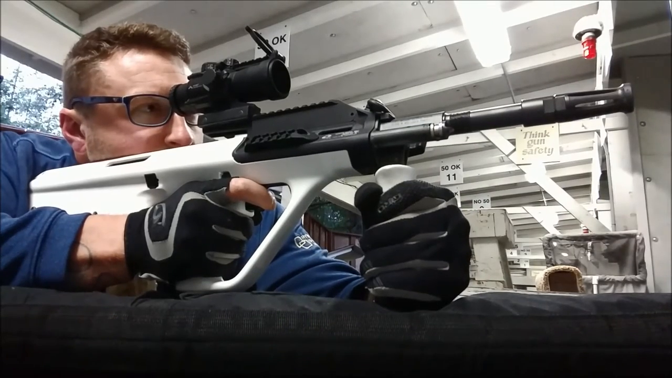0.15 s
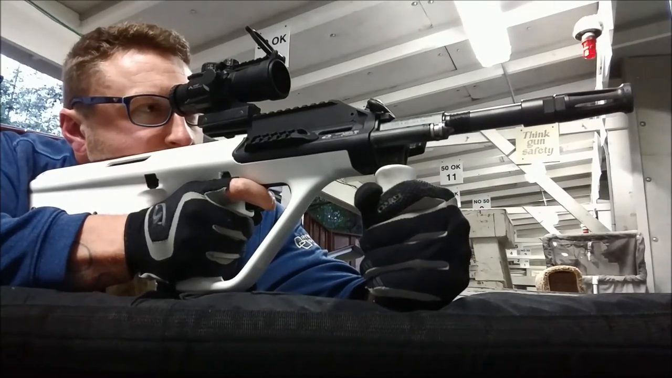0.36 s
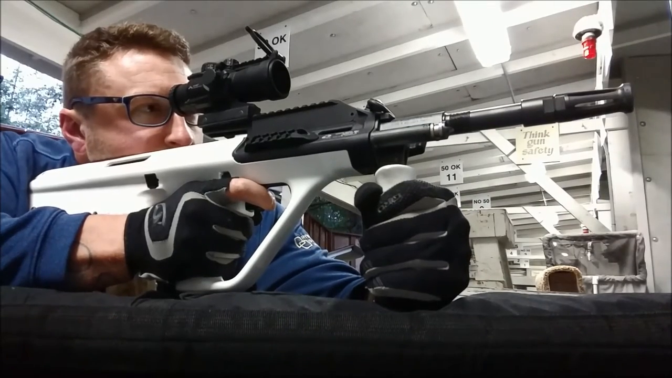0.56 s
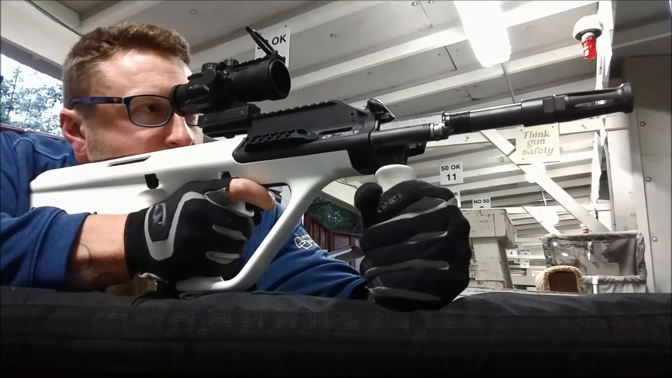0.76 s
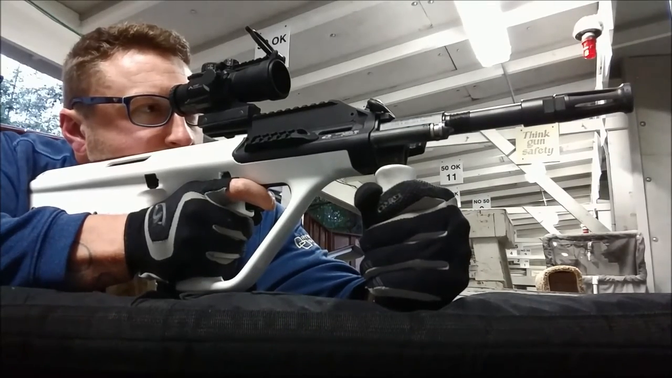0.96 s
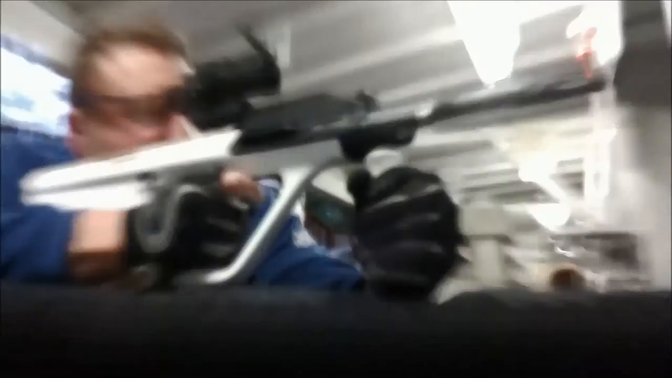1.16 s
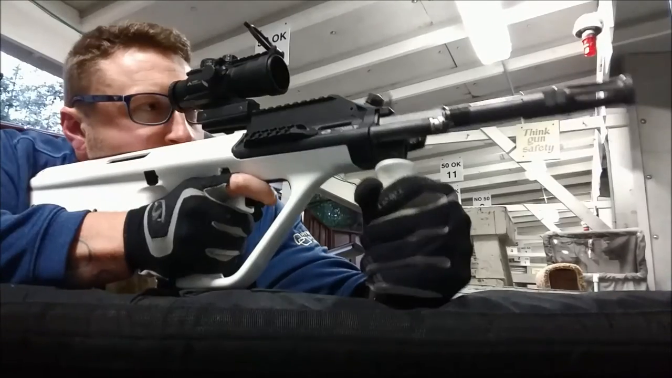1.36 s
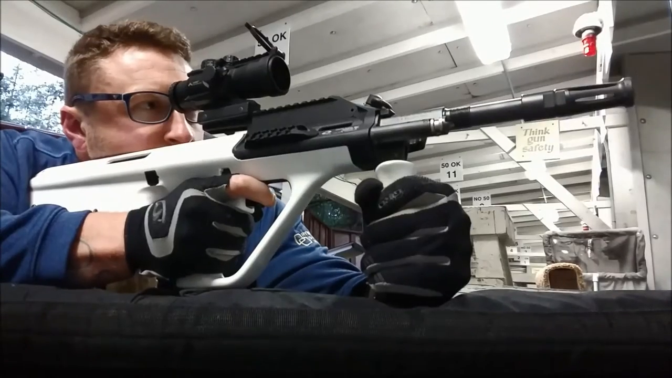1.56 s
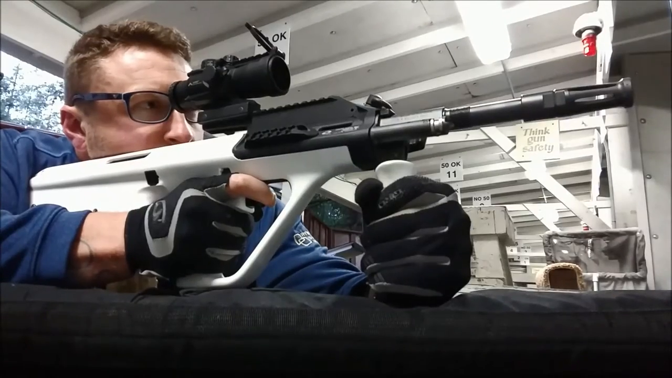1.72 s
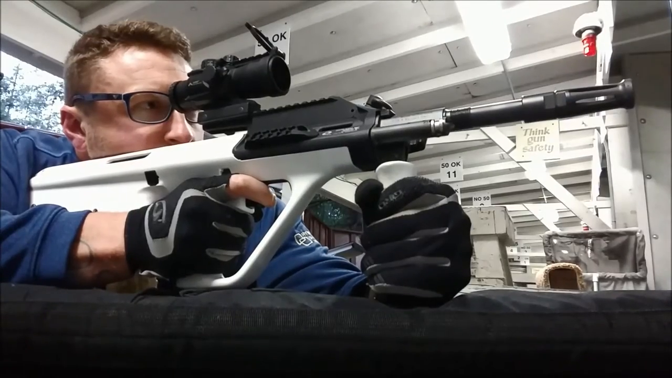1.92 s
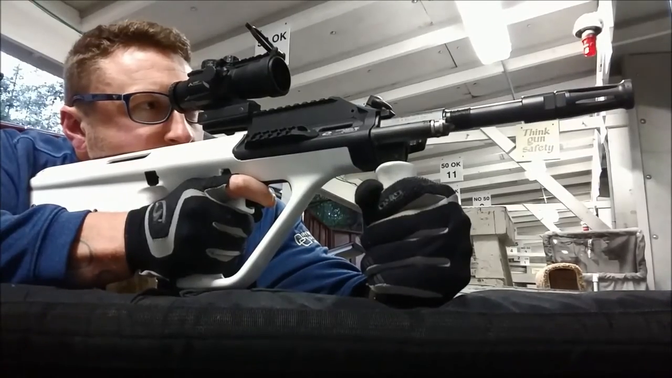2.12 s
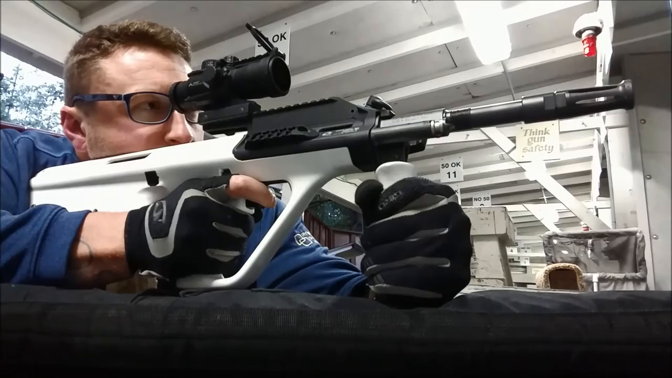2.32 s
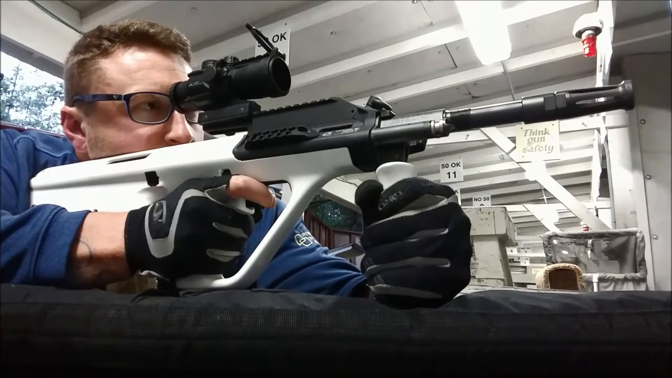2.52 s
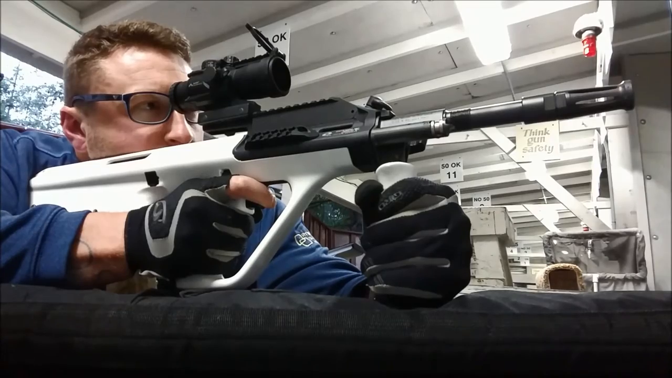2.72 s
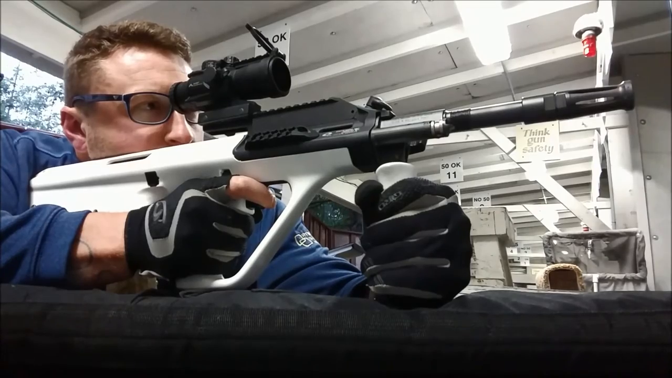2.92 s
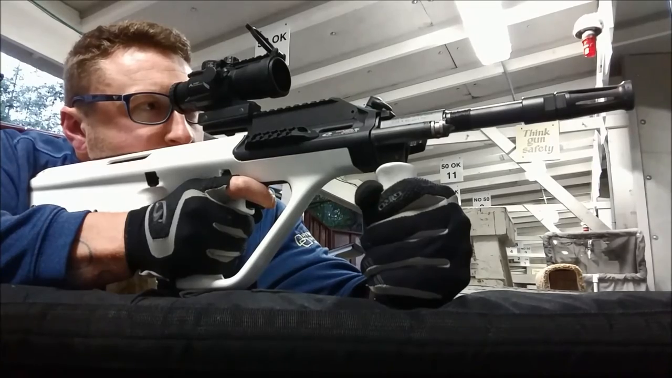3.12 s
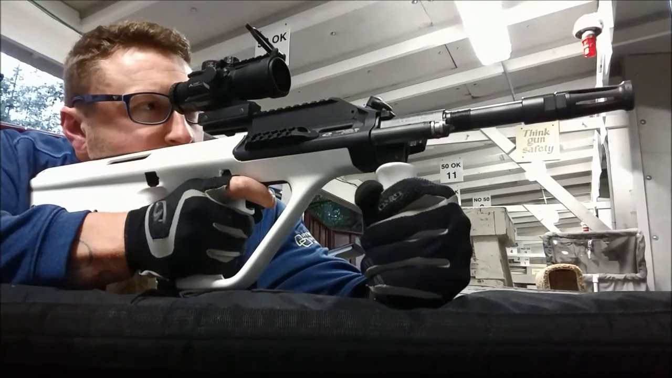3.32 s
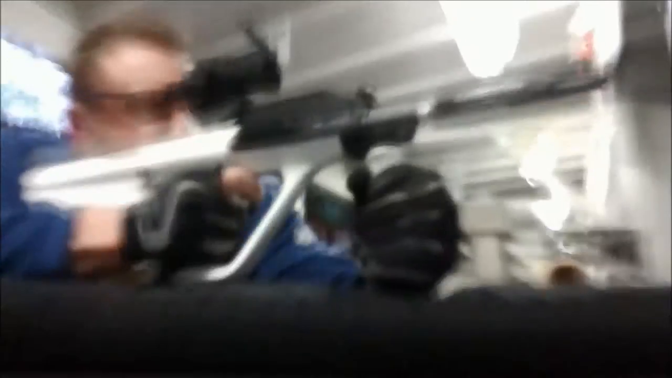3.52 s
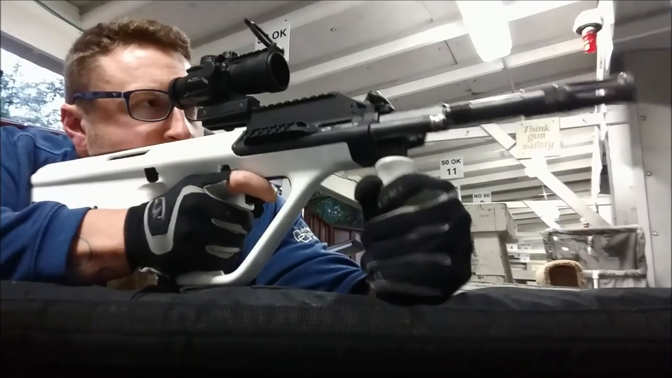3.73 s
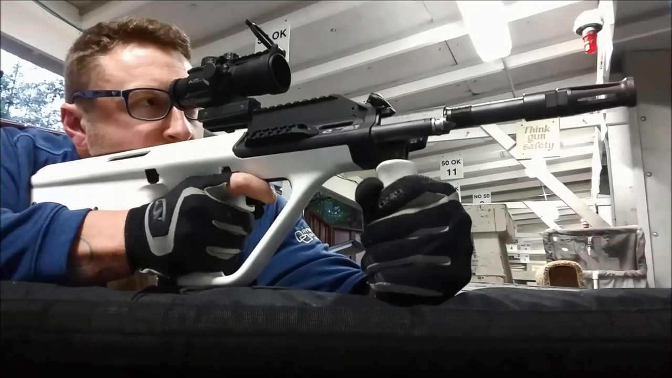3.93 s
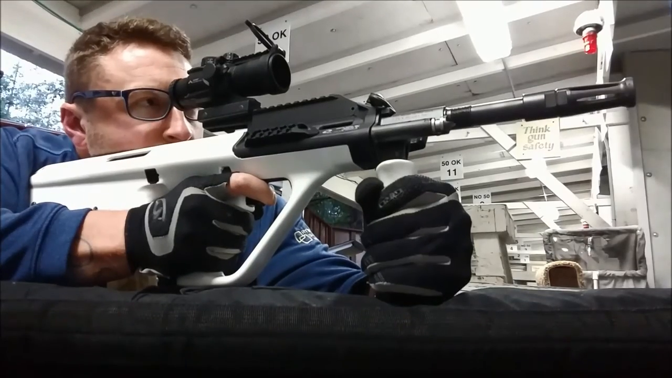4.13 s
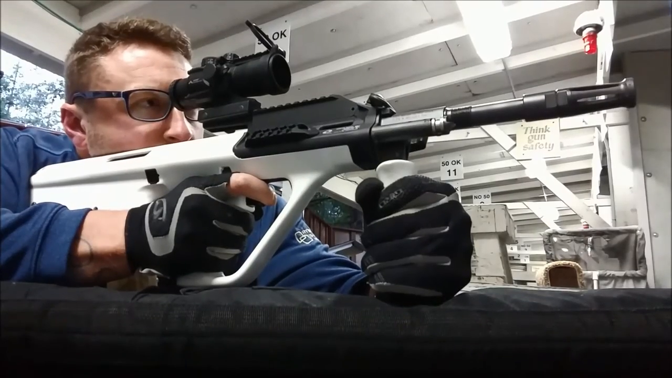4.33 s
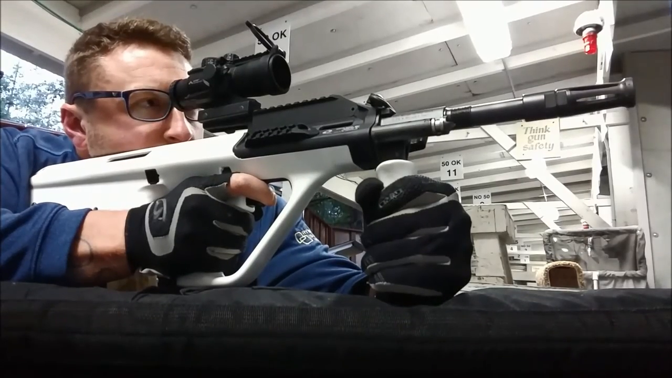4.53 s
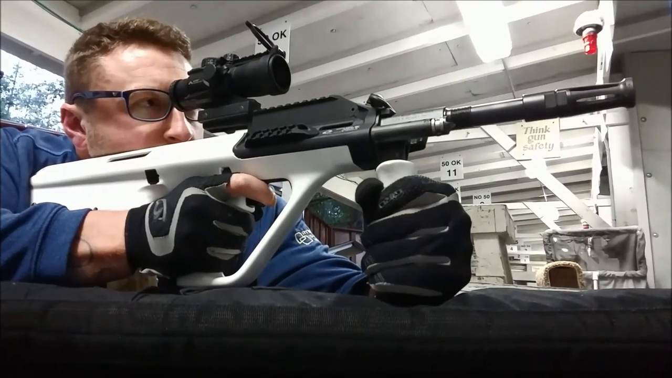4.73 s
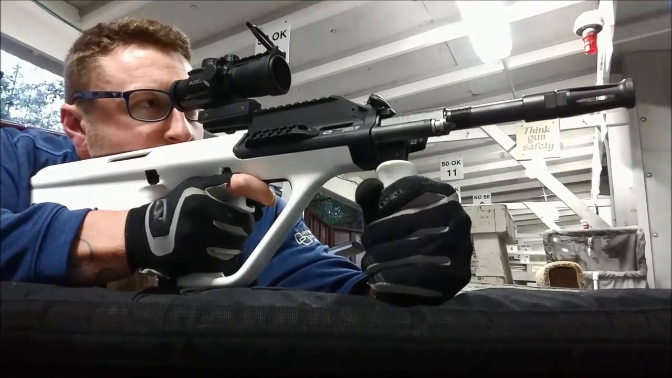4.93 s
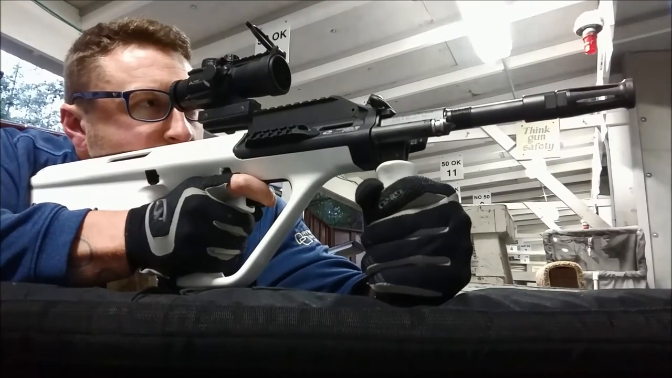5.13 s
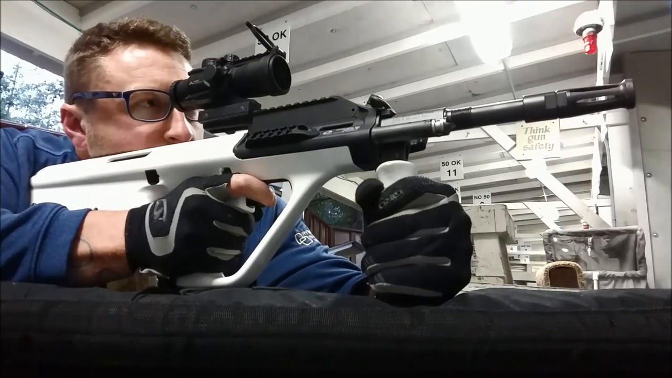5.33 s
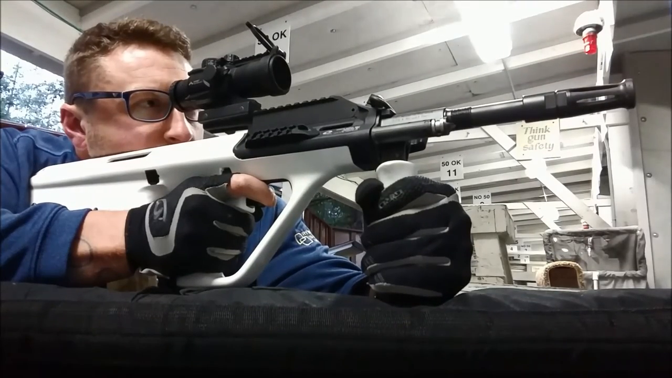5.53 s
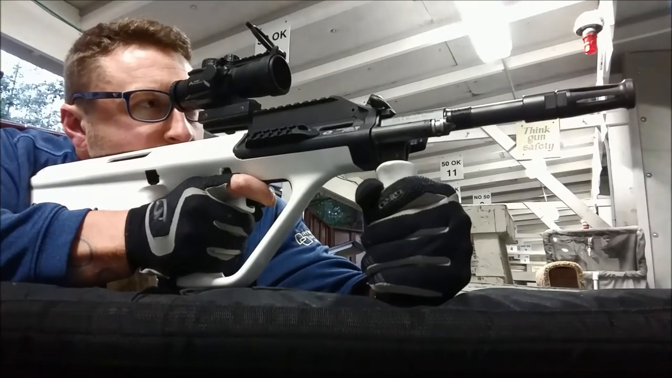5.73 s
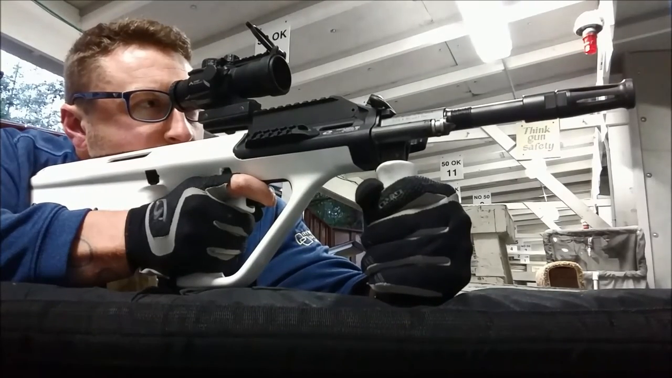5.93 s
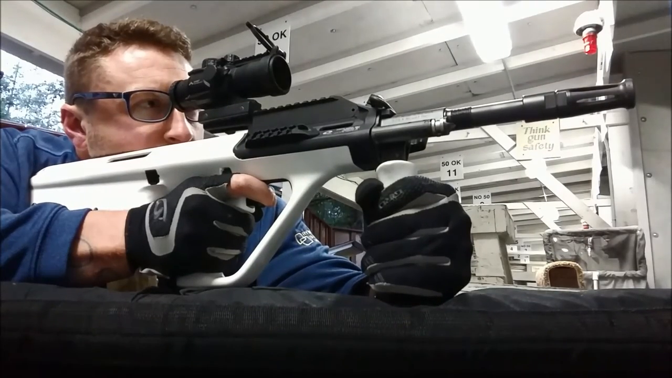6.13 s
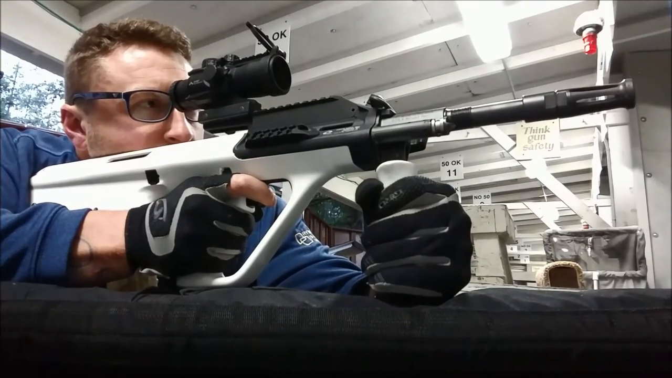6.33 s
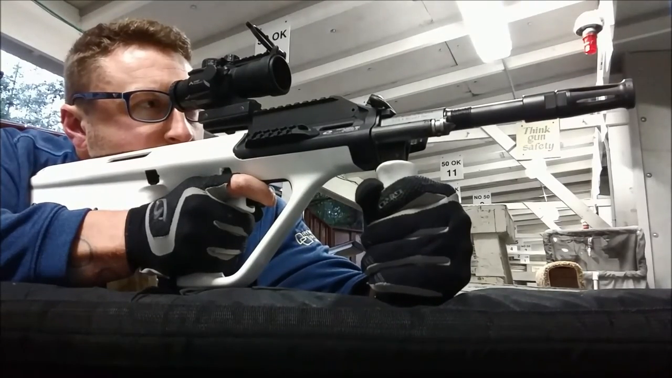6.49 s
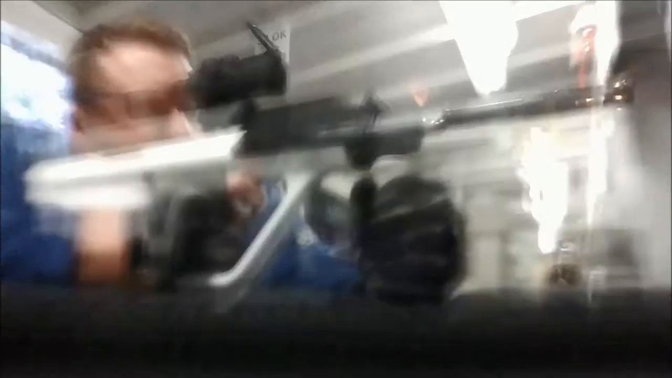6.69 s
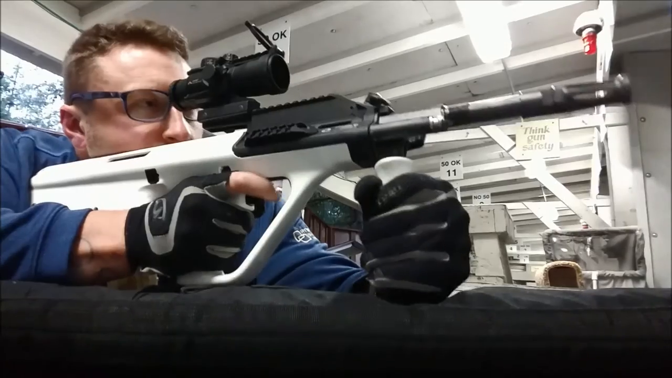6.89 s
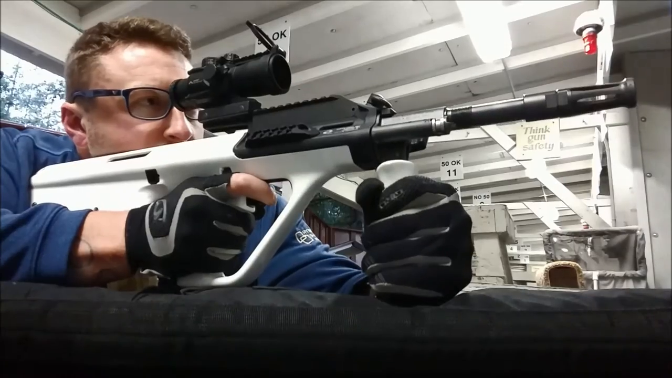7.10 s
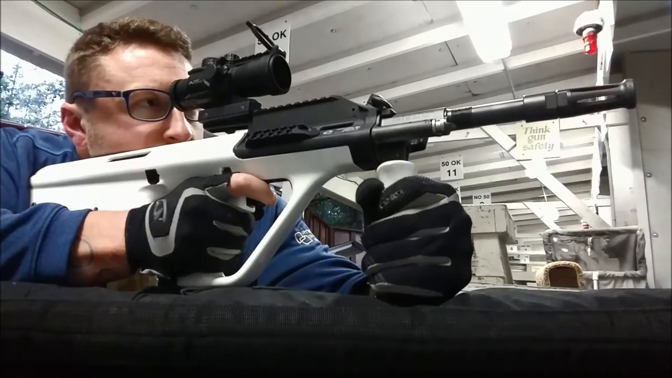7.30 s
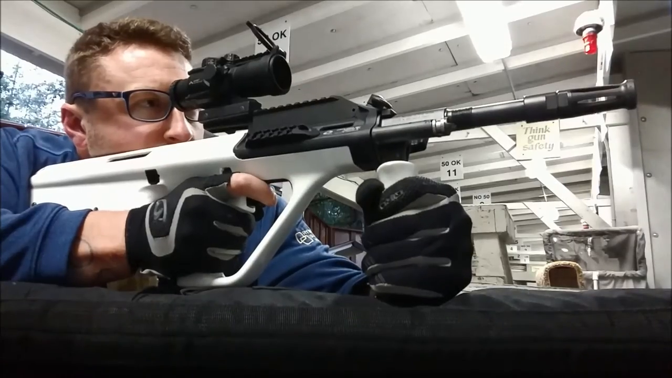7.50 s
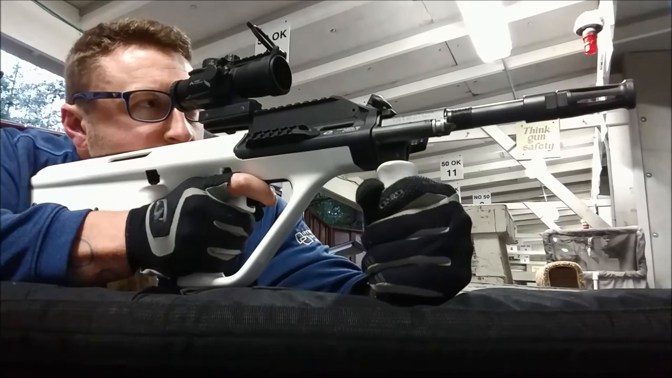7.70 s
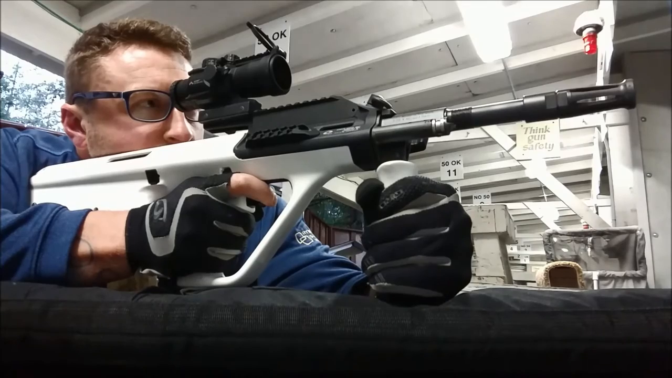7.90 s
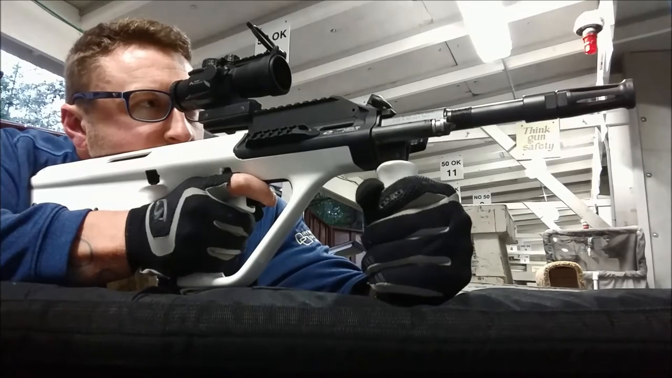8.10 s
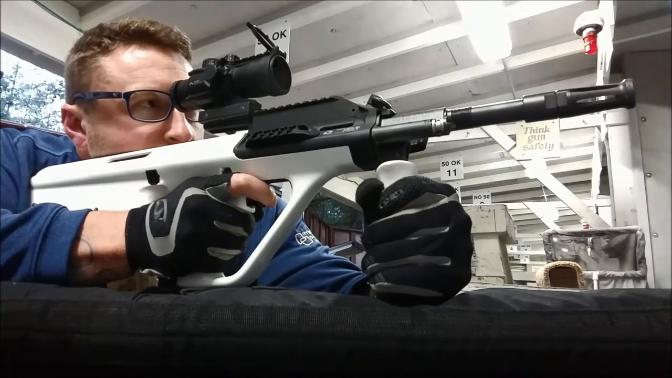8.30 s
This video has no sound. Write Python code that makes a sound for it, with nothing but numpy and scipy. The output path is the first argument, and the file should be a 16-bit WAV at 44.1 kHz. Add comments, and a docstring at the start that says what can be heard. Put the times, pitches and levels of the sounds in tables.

```python
"""A rifle fires slow single shots under the roof of a shooting range, half a metre from a phone.
Each blast overloads the two microphones, roars back from roof and baffles, slaps off the backstop
and rolls away outdoors. A neighbour fires once, further along the line. Spent brass rings and
bounces on the concrete, and one case strikes a steel panel. Underneath lies a bed of open air,
with faint rustles as the shooter settles."""
import sys
import numpy as np
from scipy import signal
from scipy.fft import rfft, irfft, next_fast_len
from scipy.io import wavfile

SR = 44100
rng = np.random.default_rng(int(sys.argv[2]) if len(sys.argv) > 2 else 0)


def generate_wav(signal):
    """Clip the signal to [-1, 1] and save it as 16-bit WAV at the path in sys.argv[1]."""
    frames = np.transpose(np.atleast_2d(signal))
    scaled = np.clip(frames, -1, 1) * 32767
    pcm = np.round(scaled).astype(np.int16)
    wavfile.write(sys.argv[1], SR, pcm)


N = 368235

# bed of open air: (frequency [Hz], noise density [dB])
OPEN_AIR = [(25, -85), (42, -79.5), (60, -81), (82, -76.5), (130, -82), (200, -87), (330, -92), (750, -94),
            (1050, -102), (2200, -103), (4200, -113), (8000, -115), (13000, -111.5), (16000, -115)]
# the shooter settles on the bench: (time [s], gain [dB])
RUSTLE_CUES = [(.655, -104), (2.965, -96), (3.305, -99), (6.28, -101), (6.51, -101)]

# noise colours and their tails: (frequency [Hz], relative density [dB], t60 [s])
SLEEVE_RUSTLE = [(200, 6, .3), (900, 3, .25), (2500, -1, .25), (7000, -7, .2), (15000, -11, .2)]
CONCRETE_TICK = [(2500, -19, .15), (5000, -8, .28), (8000, -4.5, .27), (12000, -4, .2), (16000, 1, .12)]
PANEL_KNOCK = [(130, -75, .2), (225, -42, .22), (320, -66, .2), (1000, -63, .3), (2800, -59.5, .35),
               (3600, -73, .3), (6500, -69, .28), (11000, -70, .2), (15500, -74, .15)]
NEIGHBOUR_BLAST = [(30, -53, .4), (65, -42, .35), (110, -47, .35), (170, -38, .3), (250, -40.5, .3),
                   (340, -53, .3), (650, -35, .33), (1000, -47.5, .3), (2200, -56, .3), (6000, -64, .3),
                   (14000, -67, .3)]
NEIGHBOUR_ROAR = [(30, -58, .9), (60, -55, .75), (120, -48, .5), (240, -51, .35), (350, -56, .4),
                  (650, -48, .4), (1000, -52, .45), (2000, -54, .5), (4000, -61, .5), (8000, -66, .45),
                  (13000, -70, .36), (16000, -79, .3)]
HAMMER_CLICK = [(200, -78, .06), (900, -69, .06), (2200, -70, .06), (4000, -80, .04), (6000, -96, .03),
                (14000, -102, .03)]
MUZZLE_CRACK = [(200, -50, .014), (700, -31, .014), (2000, -39, .013), (6000, -51, .013),
                (12000, -45, .011), (16000, -49, .011)]
BOOTH_REVERB = [(30, -48, .4), (65, -52, .4), (115, -40, .5), (170, -56, .4), (250, -43, .4),
                (330, -52, .4), (470, -38, .42), (700, -43, .4), (1000, -51, .3), (2000, -55, .24),
                (4000, -62, .2), (8000, -67, .2), (14000, -65, .2)]
BAFFLE_ROAR = [(25, -56, .9), (48, -49, .9), (80, -52, .6), (118, -37, .45), (175, -49, .6), (260, -47, .6),
               (370, -51.5, .55), (530, -45.5, .55), (720, -48.5, .5), (1000, -56.3, .6), (2000, -56.5, .6),
               (4000, -65.5, .75), (8000, -71.5, .7), (13000, -71.5, .5), (16000, -80, .4)]
BASS_BOOM = [(25, -46, .9), (48, -45.5, .95), (78, -59, .45), (120, -56, .5), (180, -51, .5),
             (240, -49, .5), (350, -49.5, .4), (480, -59, .3), (1000, -90, .3)]
BACKSTOP_SLAP = [(600, -62, .04), (1100, -52, .04), (1400, -33, .05), (1700, -38, .07), (2050, -64, .04),
                 (3600, -64, .04), (4300, -50, .09), (5200, -74, .04), (14000, -76, .03)]
OUTDOOR_ROLL = [(30, -53, 1.6), (48, -52.5, 1.7), (85, -65, 2.2), (150, -53.5, 3.0), (300, -64, 3.2),
                (650, -59.5, 3.3), (1050, -66.2, 2.8), (1500, -63, 2.7), (2600, -65.7, 2.05),
                (3400, -70, 1.8), (4200, -68.7, 1.5), (5200, -75.5, 1.3), (7000, -78, 1.1),
                (12000, -92, .75)]
MIC_CRACKLE = [(200, -47, .012), (1500, -45.5, .012), (3500, -55, .012), (7500, -63, .012),
               (13000, -51, .01), (16000, -57, .01)]

# ring of a brass case's mouth and of the steel panel: (frequency [Hz], relative level [dB], t60 [s])
BRASS_LOW_MODES = [(10650, -2, .25), (10730, 0, .25), (10900, -7, .24)]
BRASS_HIGH_MODES = [(14950, -10, .3), (15050, 0, .26), (15140, -6, .28), (15380, -13, .18)]
PANEL_MODES = [(994, -12, 1.0), (1341, -10, 1.6), (1439, -10, 1.5), (1781, -9, .6), (2312, -4, .77),
               (2390, -7, .5), (2544, 0, .35), (2598, -1, .5), (3058, -8, .5), (3156, -9, .54),
               (4624, -11, .45), (4673, -13, .9), (4947, -14, .46), (5620, -9, .5), (6272, -11, .46),
               (6783, -10, .48)]
# a case lands or bounces: (time [s], strength [dB], low ring against high ring [dB])
LANDINGS = [(1.788, -34, -12), (2.126, -49, -24), (2.2815, -45, -24), (4.184, -37, -5), (4.4773, -40, -30),
            (4.684, -33.5, -30), (4.8969, -52, -20), (7.4037, -34, 6), (8.3216, -49, -10)]
# out of height, a case skitters end over end: (start [s], length [s], opening strength [dB])
SKITTERS = [(-.02, .25, -47.5), (4.9627, .42, -54.5), (8.0766, .12, -56)]

# the near rifle, its first shot already rolling away as the scene opens: (time [s], gain [dB])
SHOTS = [(-1.02, 0), (1.1650, 0), (3.5453, 0), (6.7626, .8)]
# the pressure front arrives direct, then off bench, post and roof: (delay [s], gain [dB])
FRONT_PATHS = [(.0007, 10), (.0029, -2), (.0046, -7), (.0103, -6)]

# dropout after each near shot, left microphone then right: (start [s], end [s], depth [dB])
DROPOUTS = [(.059, .113, -19), (.040, .0764, -24)]
# the right microphone port hears more presence: (frequency [Hz], left minus right [dB])
PORT_COLOUR = [(100, -1.5), (700, -1.3), (1290, 0), (2380, -4.2), (4400, -3.3), (8100, .3), (15000, -1)]

NEIGHBOUR_S, PANEL_S = 7.5442, 7.9429
SKITTER_GAP_S, SKITTER_FALL_DB_PER_S, SKITTER_SCATTER_DB = .085, 30, 1.5
HAMMER_LEAD_S, JOLT_LEAD_S = .027, .0028
BOOM_DELAY_S, BACKSTOP_DELAY_S, BANK_DELAY_S, BANK_HZ = .1, .2362, .53, 152
PORT_LAG_S, CRACKLE_DELAY_S, CLIP_CEILING, TOP_HZ = 19 / SR, .0766, .84, 15900


def undb(db):
    """Decibels to gain."""
    return 10 ** (np.asarray(db) / 20)


def pan(left_db, right_db):
    """A gain for each channel."""
    return undb([[left_db], [right_db]])


def clock(seconds):
    """Time axis of a sound."""
    return np.arange(next_fast_len(int(seconds * SR))) / SR


def fade(t, t60):
    """Full level until t = 0, then a fall of 60 dB every t60."""
    return np.exp(-np.log(1000) * np.maximum(t, 0) / t60)


def swell(t, seconds):
    """Smooth attack from 0 to 1."""
    return np.sin(np.pi / 2 * np.clip(t / seconds, 0, 1)) ** 2


def along(hz, points, values):
    """Straight lines on a log-frequency axis."""
    return np.interp(np.log(np.maximum(hz, 1)), np.log(points), values)


def low_cut(sound, hz, order):
    """Roll off the bass below hz."""
    return signal.sosfilt(signal.butter(order, hz, "high", fs=SR, output="sos"), sound)


def add(out, s, sound):
    """Mix a stereo sound in at time s."""
    start = int(round(s * SR))
    lo, hi = max(start, 0), min(start + sound.shape[1], out.shape[1])
    if hi > lo:
        out[:, lo:hi] += sound[:, lo - start:hi - start]


def diffuse(size, hz, db, grain_db=0):
    """Coloured noise from all sides, narrow in the bass, wide above; grain makes echoes stand out."""
    f = np.fft.rfftfreq(size, 1 / SR)
    grain = undb(grain_db * np.repeat(rng.standard_normal(size // 32 + 1), 32)[:size])
    mid, side = rfft(rng.standard_normal((2, size)) * grain / np.sqrt(np.mean(grain ** 2)))
    coherence = .8 * np.sinc(2 * f * PORT_LAG_S * 1.15)
    ports = mid * np.sqrt(1 + coherence) + np.array([[1], [-1]]) * side * np.sqrt(1 - coherence)
    sub_cut = np.clip(f / 25, 0, 1) ** 2
    return irfft(ports * sub_cut * undb(along(f, hz, db)) * np.sqrt(SR) / 2, size)


def wash(table, t, hold=0., grain_db=0):
    """Diffuse noise that holds for hold seconds, then dies at its own pace in every octave."""
    hz, db, t60 = np.transpose(table)
    spectrum = rfft(diffuse(len(t), hz, db, grain_db))
    f, octaves = np.fft.rfftfreq(len(t), 1 / SR), np.geomspace(30, 15360, 10)
    sound = 0
    for centre, share in zip(octaves, np.eye(len(octaves))):
        band = irfft(spectrum * along(f, octaves, share), len(t))
        sound += band * fade(t - hold, along(centre, hz, t60))
    return sound


def modes(table, t, detune=0.):
    """Ringing metal: decaying sines, randomly detuned if asked, each port at its own phase."""
    ring = 0
    for hz, db, t60 in table:
        pitch = hz * (1 + detune * rng.standard_normal())
        ring += undb(db) * fade(t, t60) * np.sin(2 * np.pi * (pitch * t + rng.random((2, 1))))
    return ring


def air_and_rustles():
    """Steady outdoor air, with faint rustles of sleeve and rest."""
    out, t = diffuse(next_fast_len(N), *np.transpose(OPEN_AIR))[:, :N], clock(.4)
    for s, db in RUSTLE_CUES:
        add(out, s, undb(db) * wash(SLEEVE_RUSTLE, t, hold=.03, grain_db=4) * swell(t, .03))
    return out


def clink(strength_db, low_ring_db, tick_db):
    """One blow ticks on the concrete and rings the brass; the roof smears the ring into a flutter."""
    t = clock(.4)
    roof = undb(-26) * rng.standard_normal((2, len(t))) * fade(t, .27)
    roof[:, 0] = 1  # the direct sound
    snap = (1 + 2.5 * fade(t, .02)) * swell(t, .002)
    sound = undb(tick_db) * wash(CONCRETE_TICK, t, grain_db=3) * snap
    for table, db in ((BRASS_LOW_MODES, low_ring_db), (BRASS_HIGH_MODES, 0)):
        tumbling = modes(table, t, detune=.0025)
        ring = signal.fftconvolve(tumbling, roof, axes=1)[:, :len(t)]
        sound += undb(db) * ring / np.std(ring[:, :SR // 20])
    return undb(strength_db) * sound * pan(-1.2, 1.2)  # the brass is thrown out to the right


def spent_cases():
    """Brass lands and bounces on the concrete, or skitters in uneven taps that die away."""
    out = np.zeros((2, N))
    for s, strength_db, low_ring_db in LANDINGS:
        add(out, s, clink(strength_db, low_ring_db, tick_db=-46))
    for s, length, first_db in SKITTERS:
        age = 0
        for gap, force, tilt in rng.standard_normal(size=(6, 3)):
            tap_db = first_db - SKITTER_FALL_DB_PER_S * age + SKITTER_SCATTER_DB * force
            low_ring_db = -2.5 + SKITTER_SCATTER_DB * tilt
            if age < length:
                add(out, s + age, clink(tap_db, low_ring_db, tick_db=-53))
            age += SKITTER_GAP_S * np.exp(.15 * gap)
    return out


def steel_panel():
    """The neighbour's case knocks on a steel panel, which rings on."""
    out, t = np.zeros((2, N)), clock(.6)
    knock = undb(-.7) * wash(PANEL_KNOCK, t, grain_db=3)
    ring = undb(-32.5) * modes(PANEL_MODES, t)
    add(out, PANEL_S, (knock + ring) * swell(t, .003))
    return out


def neighbour_shot():
    """A shot down the line: a dull front bent round the partitions, a sharp roof echo, then the roar."""
    out, t = np.zeros((2, N)), clock(1.2)
    front = -np.sin(2 * np.pi * 510 * t) * fade(t, .028) * swell(t, .001) * pan(-3, 1.5)
    blast = undb(-2.5) * wash(NEIGHBOUR_BLAST, t, hold=.022, grain_db=3) * swell(t, .006)
    roar = undb(.5) * wash(NEIGHBOUR_ROAR, t, hold=.118, grain_db=3.5) * swell(t, .06)
    crack = wash(MUZZLE_CRACK, clock(.1))
    roll = undb(-1) * wash(OUTDOOR_ROLL, t, hold=.17, grain_db=2) * swell(t, .15)
    add(out, NEIGHBOUR_S, front + blast + roar + low_cut(roll, hz=700, order=1))
    add(out, NEIGHBOUR_S, undb(-12) * crack)
    add(out, NEIGHBOUR_S + .0158, undb(-8) * crack)  # off the roof
    return out


def pressure_front(t, push_s=.0017):
    """The punch of a shot: a jump of pressure and its suction, repeated by nearby surfaces."""
    wave = 0
    for delay, db in FRONT_PATHS:
        age = (t - delay - np.array([[0], [PORT_LAG_S / 2]])) / push_s
        wave += undb(db) * (age > 0) * (1 - age) * np.exp(-np.abs(age))
    return low_cut(wave, hz=58, order=2)  # the ports pass no steady pressure, so it swings back


def muzzle_blast():
    """Punch and crack, then the range answers: booth, roof and baffles, backstop, distant bank."""
    t, brief = clock(1.2), clock(.2)
    punch = undb(-.8) * pressure_front(t)
    booth = undb(.7) * wash(BOOTH_REVERB, t, grain_db=3) * pan(-2.2, 1.9)
    roar = undb(.4) * wash(BAFFLE_ROAR, t, hold=.21, grain_db=3) * swell(t, .11)
    # the bass comes back last from the far baffles, so the roar sinks in pitch
    boom = undb(-.3) * wash(BASS_BOOM, t, hold=.275, grain_db=2) * swell(t - BOOM_DELAY_S, .11)
    blast = punch + booth + roar + boom
    add(blast, .0004, undb(2.3) * wash(MUZZLE_CRACK, brief) * pan(-2.6, 2.4))
    add(blast, BACKSTOP_DELAY_S, undb(.3) * wash(BACKSTOP_SLAP, brief) * pan(1.5, -1.5))
    # the bank returns only a soft boom, dead centre
    bank = np.sin(2 * np.pi * BANK_HZ * brief) * swell(brief, .05) * (1 - swell(brief - .06, .04))
    add(blast, BANK_DELAY_S, bank * pan(-33, -33))
    return blast


def rifle():
    """The hammer falls, the rifle's body jolts, the muzzle blasts and the shot rolls away outdoors."""
    out, brief, tail = np.zeros((2, N)), clock(.2), clock(3.4)
    blast = muzzle_blast()  # muzzle and roof stay put, so every shot has the same near echoes
    hammer = undb(1) * wash(HAMMER_CLICK, brief) * swell(brief, .004)
    jolt = undb(19) * wash(HAMMER_CLICK, brief) * fade(brief, .03)
    for s, db in SHOTS:
        roll = wash(OUTDOOR_ROLL, tail, hold=.25, grain_db=2) * swell(tail, .25)
        add(out, s - HAMMER_LEAD_S, hammer)
        add(out, s - JOLT_LEAD_S, jolt)
        add(out, s, undb(db) * blast)
        add(out, s, undb(db) * roll)
    return out


def scene():
    """Both rifles and their brass over the bed of open air."""
    return rifle() + neighbour_shot() + spent_cases() + steel_panel() + air_and_rustles()


def record(dry):
    """The phone colours each port, drops out after a near blast, crackles back and clips the peaks."""
    size, t = next_fast_len(N), clock(.15)
    tilt_db = along(np.fft.rfftfreq(size, 1 / SR), *np.transpose(PORT_COLOUR))
    sound = irfft(rfft(dry, size) * undb(np.array([tilt_db, -tilt_db]) / 2), size)[:, :N]
    dropout_db = np.array([depth_db * swell(t - start, .005) * (1 - swell(t - end, .001))
                           for start, end, depth_db in DROPOUTS])
    duck_db = np.zeros((2, N))
    for s, _ in SHOTS:
        add(duck_db, s, dropout_db)
    sound *= undb(duck_db)
    right_only = np.array([[0], [1]])
    crackle = wash(MIC_CRACKLE, t, hold=.005, grain_db=5) * swell(t, .003) * right_only
    for s, _ in SHOTS:
        add(sound, s + CRACKLE_DELAY_S, crackle)
    clipped = CLIP_CEILING * np.tanh(sound / CLIP_CEILING)
    high_cut = signal.ellip(10, .2, 70, TOP_HZ, fs=SR, output="sos")
    return signal.sosfilt(high_cut, clipped)


dry = scene()
out = record(dry)
generate_wav(out)
```